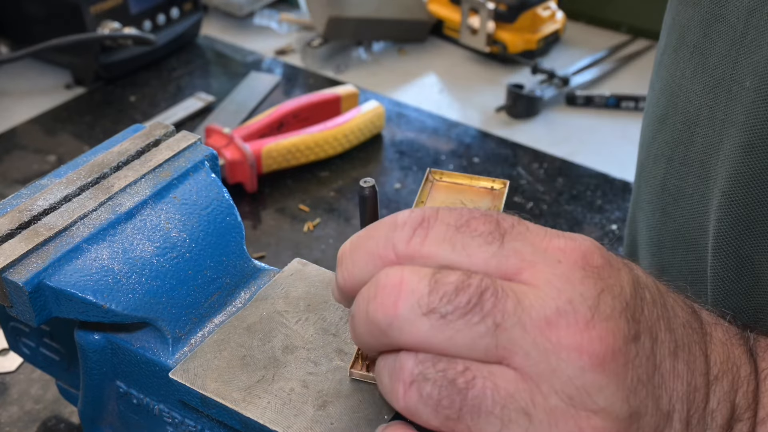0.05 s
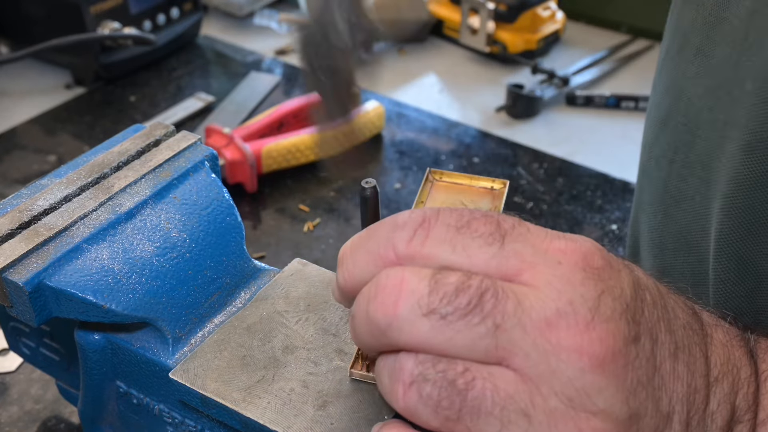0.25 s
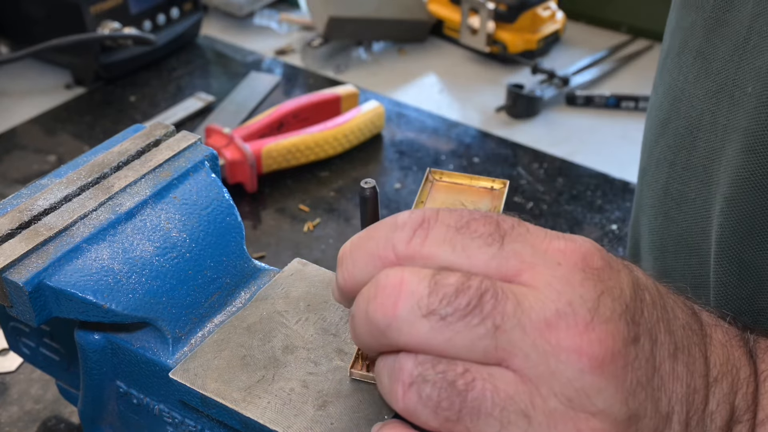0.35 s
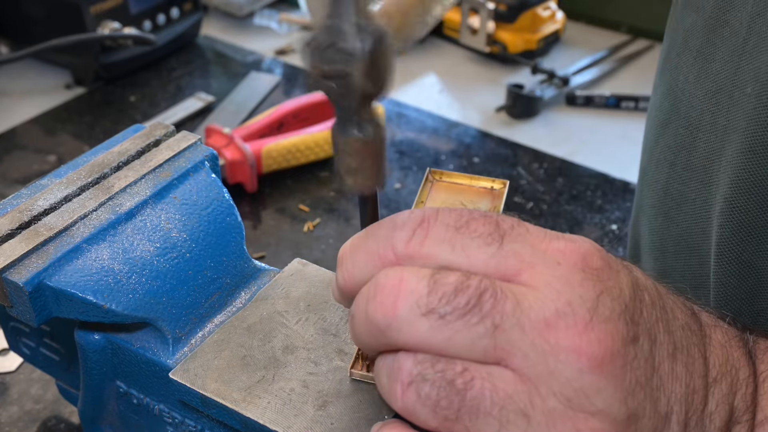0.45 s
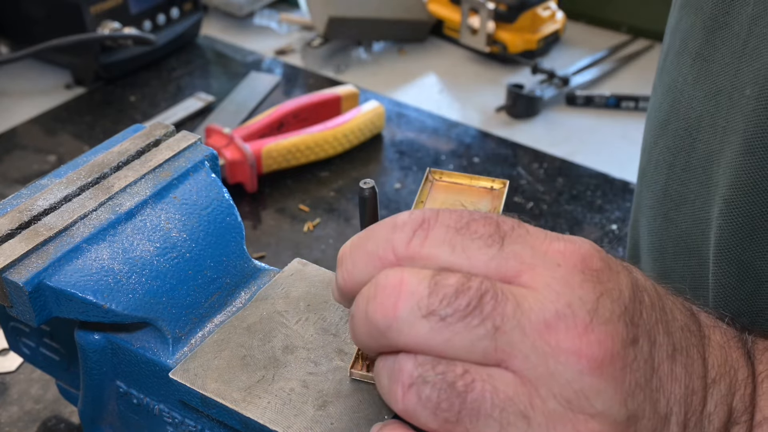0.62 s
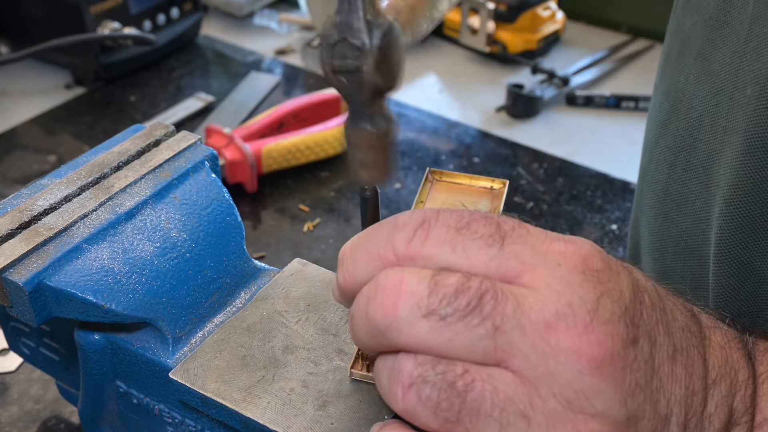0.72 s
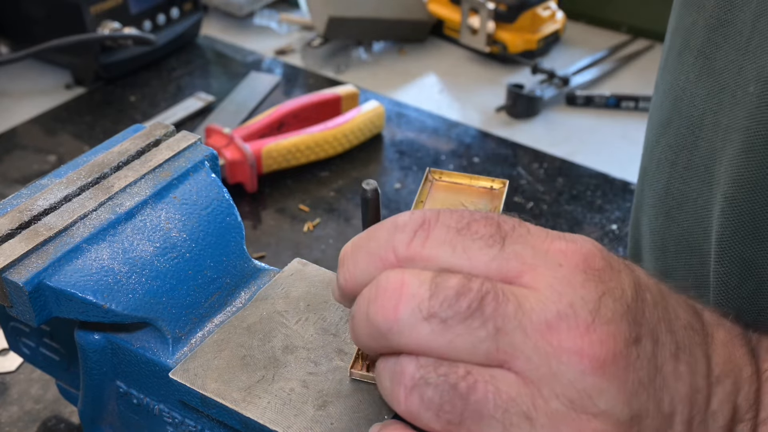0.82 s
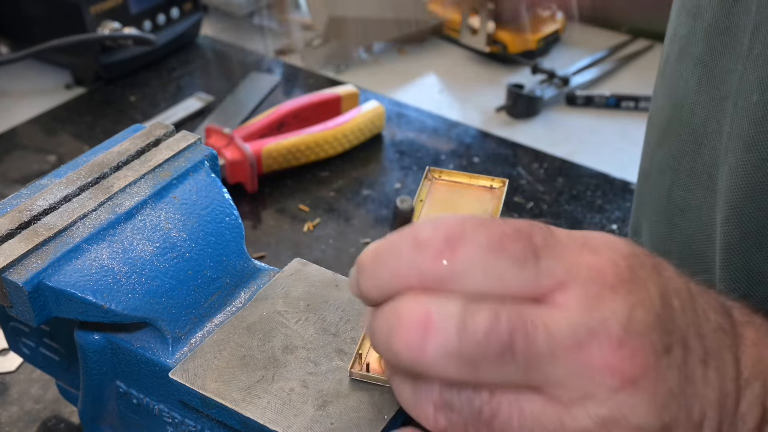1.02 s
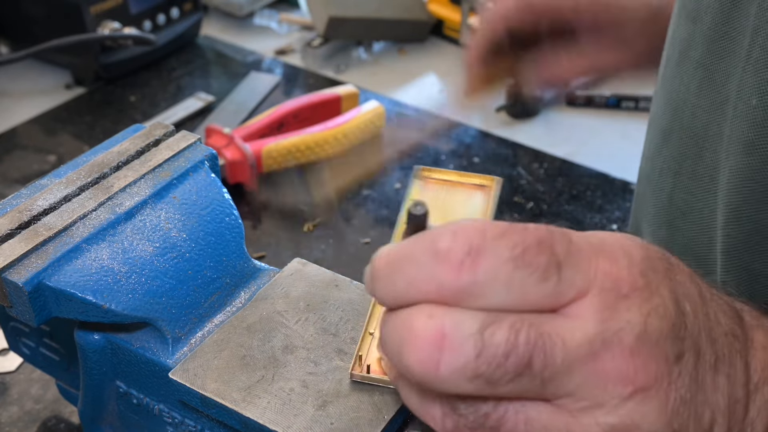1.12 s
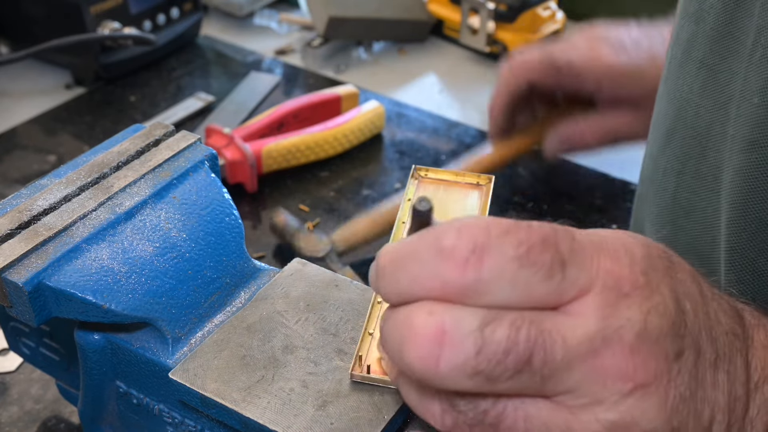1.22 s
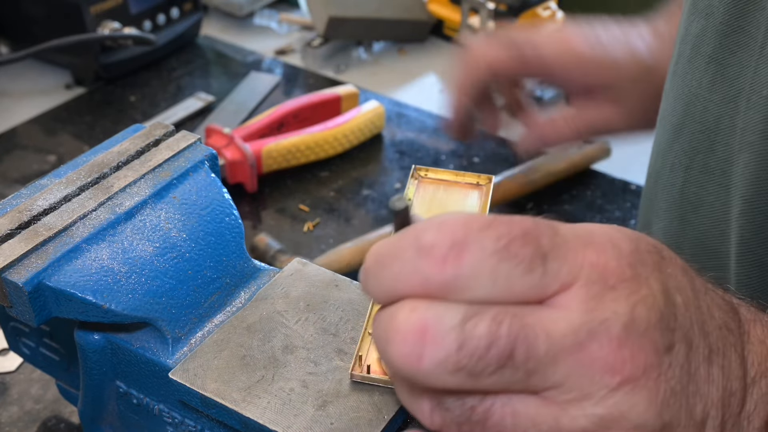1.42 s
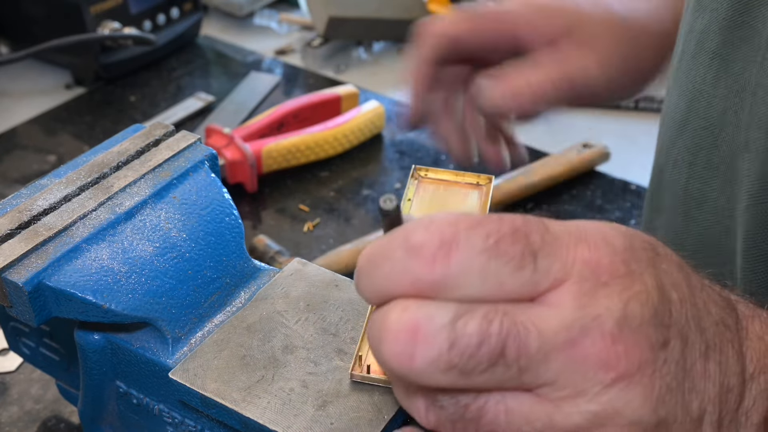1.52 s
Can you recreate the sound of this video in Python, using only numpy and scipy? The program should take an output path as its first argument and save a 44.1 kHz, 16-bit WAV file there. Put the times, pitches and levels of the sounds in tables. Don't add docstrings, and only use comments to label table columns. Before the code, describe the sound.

Loud, sharp steel-on-steel taps about four per second, each with a wooden thump and short room echo, then a tiny double tick and a wooden-handled hammer laid down, rattling to rest, heard close in a small workshop.

```python
import sys
import numpy as np
from scipy import signal
from scipy.fft import rfft, irfft, next_fast_len
from scipy.io import wavfile

SR = 44100
rng = np.random.default_rng(int(sys.argv[2]) if len(sys.argv) > 2 else 0)


def attenuation_scalar(level_db):
    decades = np.asarray(level_db, float) / 20
    return 10 ** decades


def inscribe(sig):
    pcm = np.round(np.clip(np.atleast_2d(sig).T, -1, 1) * 32767)
    wavfile.write(sys.argv[1], SR, pcm.astype(np.int16))


N = 68355
LEAD = SR // 10
T = np.arange(SR // 2) / SR

# pitch_hz, level_db (per Hz)
CRACK_COLOUR = [(290, -15), (500, 5.5), (4090, -3), (8210, -8), (9220, -9), (10100, -11.5), (14000, -7),
                (16000, -21.5)]
# pitch_hz, level_db (per Hz)
WASH_COLOUR = [(1500, -11.5), (3000, -3), (4300, -3.5), (7000, -3), (9500, -2), (12000, -7.5),
               (14500, -5.5), (16000, -12.5)]


def unit(x):
    return x / np.sqrt(np.mean(x ** 2) + 1e-20)


def along(points, hz):
    f, v = np.transpose(points)
    return np.interp(np.log(hz + 1), np.log(f + 1), v)


def coloured(x, gain):
    size = next_fast_len(len(x) + 8192)
    hz = np.fft.rfftfreq(size, 1 / SR)
    return irfft(rfft(x, size) * gain(hz), size)[:len(x)]


def hiss(spectrum, size):
    return unit(coloured(rng.standard_normal(size), lambda hz: attenuation_scalar(along(spectrum, hz))))


def fade(t60, rise, lag=0):
    t = np.maximum(T - lag, 0)
    return attenuation_scalar(-60 * t / t60) * (1 - np.exp(-t / rise))


def ring(modes, scatter_db, rise, lag=0):
    out = np.zeros(len(T))
    for hz, db, t60 in modes:
        strength = attenuation_scalar(db + scatter_db * rng.normal())
        out += strength * fade(t60, rise, lag) * np.sin(2 * np.pi * hz * (T - lag))
    return out


def dying(noise, rise):
    # pitch_hz, t60_s
    room = [(100, .3), (400, 0.23), (1200, 0.33), (3000, 0.3), (5500, 0.31), (9000, 0.28), (12000, 0.26),
            (15000, 0.22)]
    hz, t, z = signal.stft(noise, SR, nperseg=128)
    loss = attenuation_scalar(-60 * t / along(room, hz)[:, None])
    out = signal.istft(z * loss, SR, nperseg=128)[1][:len(T)]
    return out * (1 - np.exp(-T / rise))


def add(track, s, sound):
    part = track[LEAD + round(s * SR):][:len(sound)]
    part += sound[:len(part)]


def quiet_air():
    # pitch_hz, level_db (per Hz)
    air = [(25, -4.5), (100, -3.5), (344, -1), (450, -12), (800, -12), (2200, -22.5), (6000, -27),
           (16000, -43.5)]
    return attenuation_scalar(-67.5) * hiss(air, N)


def tray_ticks(track):
    # start_s, level_db (peak)
    ticks = [
        (.969, -39.5),
        (.974, -36),
    ]
    # pitch_hz, level_db, t60_s
    tray = [(2760, 5, 0.0082), (3600, 5, 0.0096), (6300, -9.5, 0.029), (12100, -14, 0.011)]
    for s, level_db in ticks:
        tinkle = attenuation_scalar(-5.5) * ring(tray, 1.67, 0.00025)
        scrape = attenuation_scalar(-7.5) * fade(0.023, 0.00013) * hiss(CRACK_COLOUR, len(T))
        echoes = attenuation_scalar(-22.5) * dying(hiss(CRACK_COLOUR, len(T)), .002)
        add(track, s, attenuation_scalar(level_db) * (tinkle + scrape + echoes))


def clack(top_hz):
    # pitch_hz, level_db, t60_s
    handle = [(1575, 5, .015), (2278, -13, 0.042), (2933, 4.5, 0.018), (3510, 7, 0.015), (3810, -5, .015),
              (4945, -1, 0.03), (5800, -4, 0.011), (6200, -19.5, 0.054)]
    # pitch_hz, level_db (per Hz)
    snap_colour = [(300, -24.5), (700, -13.5), (1500, 2), (2400, -3.5), (3690, 3), (5270, -7), (7170, -12),
                   (16000, -16)]
    # pitch_hz, level_db (per Hz)
    echo_colour = [(59, -61.5), (100, -55), (991, 5), (1200, -2.5), (1830, -0.5), (7610, -17), (8460, -36),
                   (9410, -46), (16000, -59.5)]
    snap = attenuation_scalar(-6.5) * fade(0.021, 0.00026) * hiss(snap_colour, len(T))
    u = T / 0.00011
    click = -2 * attenuation_scalar(-3) * u * (2 - u) * np.exp(-u)
    ringing = attenuation_scalar(-12.5) * ring(handle, 2, 0.00042)
    echoes = attenuation_scalar(-22) * dying(hiss(echo_colour, len(T)), 0.0011)
    bright_echoes = attenuation_scalar(-37.5) * dying(hiss(WASH_COLOUR, len(T)), 0.00072)
    soften = signal.butter(3, min(top_hz, 20000), fs=SR, output='sos')
    return signal.sosfilt(soften, ringing + snap + click + echoes + bright_echoes)


def bench_knock():
    # pitch_hz, level_db, t60_s
    wood = [(233, -5.5, 0.031), (393.7, -1, 0.068), (887, -3, 0.047), (1018, 0.5, 0.072), (1492, 4, 0.045)]
    # pitch_hz, level_db (per Hz)
    dull_colour = [(60, -24), (200, -2.5), (400, 1), (1000, -1), (2500, -13.5), (6000, -38), (16000, -68)]
    notes = attenuation_scalar(-8.5) * ring(wood, 1.48, 0.0036, 0.00108)
    return notes + attenuation_scalar(-18.5) * dying(hiss(dull_colour, len(T)), 0.0024)


def clatter(track):
    # start_s, clack_db (peak), top_hz (treble limit), knock_db
    contacts = [(1.2304, 0, 14000, -25.5), (1.244, 1.5, 12000, -12), (1.254, -35, 2980, -17),
                (1.2969, -8.5, 4500, -25.5), (1.367, -13.5, 6800, -27.5), (1.401, -19.5, 3720, -24.5),
                (1.462, -18.5, 5260, -32.5), (1.476, -14, 6800, -16), (1.485, -14, 5640, -30),
                (1.525, -18.5, 4900, -24), (1.531, -22, 4630, -36)]
    for s, clack_db, top_hz, knock_db in contacts:
        add(track, s, attenuation_scalar(clack_db) * clack(top_hz) + attenuation_scalar(knock_db) * bench_knock())


def singing_metal(track):
    # start_s, pitch_hz, level_db, t60_s
    head_notes = [(-.056, 9085, -7, .16), (-.056, 9050, -25, 0.33), (.212, 9100, -28.5, 0.13),
                  (.213, 7400, -12.5, 0.044), (.737, 9100, -12.5, 0.098), (.737, 9125, -36.5, 0.42),
                  (0.735, 9070, -41, 0.44), (1.231, 9103, -22, 0.22), (1.244, 7360, -33.5, 0.22),
                  (1.244, 3380, -28, .12), (1.242, 6160, -21.5, 0.066), (1.244, 7980, -40, 0.046),
                  (1.367, 9103, -56, 0.25), (1.41, 7360, -64, .5)]
    # start_s, pitch_hz, level_db, t60_s
    tray_notes = [
        (.969, 1262, -45.5, 0.16),
        (.974, 5141, -50.5, 0.064),
        (.974, 10870, -70.5, .3),
    ]
    for s, *mode in head_notes + tray_notes:
        add(track, s, ring([mode], 0, .001))


def crack():
    hold_s, drop_s = .004, 0.0036
    hold = 0.52 + 1 / (1 + np.exp(np.minimum((T - hold_s) / drop_s, 50)))
    return hiss(CRACK_COLOUR, len(T)) * fade(0.036, 0.0006) * hold


def punch_rattle():
    # pitch_hz, width_hz, level_db, t60_s
    punch = [(4220, 260, -0.5, 0.37), (5430, 130, -9, .24), (6170, 110, -3.5, 0.33),
             (7800, 180, -11.5, 0.27), (9200, 140, -6, 0.3), (10850, 280, -15, 0.29)]
    out = np.zeros(len(T))
    for hz, width, db, t60 in punch:
        noise = rng.standard_normal(len(T))
        band = unit(coloured(noise, lambda f: 1 / (1 + ((f - hz) / width) ** 2)))
        out += attenuation_scalar(db) * fade(t60, .002) * band
    return out


def punch_ping():
    # pitch_hz, level_db, t60_s
    ping = [(2454, -4, 0.018), (3507, -9.5, 0.0093), (4050, -7, 0.075), (4490, -2, 0.046)]
    return ring(ping, 0.87, 0.00027)


def bench_thump():
    # pitch_hz, level_db, t60_s
    bench = [(98.6, -13, 0.2), (222.3, -10.5, 0.19), (276.8, 4.5, 0.056), (419, -8, 0.16), (475, 7, 0.073),
             (700, -3.5, 0.14), (816, -1.5, 0.16), (872, -5, 0.28), (994, -11.5, 0.27), (1154, -18, 0.15),
             (1258, 7, 0.068), (1393, -23.5, 0.58), (1445, -27, 0.083), (1488, -4, 0.16)]
    # pitch_hz, level_db, t60_s
    thud = [(101, -17, 0.07), (295, -2, 0.034), (473, -1.5, 0.023), (732, -2.5, 0.038), (1330, -4, .04)]
    long_notes = attenuation_scalar(-6.5) * ring(bench, 1.3, 0.0028, 0.00298)
    return long_notes + attenuation_scalar(-3) * ring(thud, 1, 0.005, .0035)


def taps(track):
    # start_s, crack_db, thump_db, extra_brightness_db
    blows = [
        (-.056, -3, -9.5, -1),
        (.211, -3, -10, -2.5),
        (.469, -3, -8.5, 0.5),
        (.736, -4.5, -8, 4.5),
    ]
    # pitch_hz, level_db (per Hz)
    tail_colour = [(35, -37), (60, -15.5), (408, 12.5), (566, 4.5), (1010, 7.5), (2840, -8), (4120, -25.5),
                   (9350, -28.5), (16000, -7.5)]
    same = hiss(tail_colour, len(T))
    share = 0.6
    for s, crack_db, thump_db, bright_db in blows:
        wash = attenuation_scalar(bright_db - 19) * dying(hiss(WASH_COLOUR, len(T)), .002)
        metal = crack() + attenuation_scalar(-26) * punch_rattle() + wash + attenuation_scalar(-7.5) * punch_ping()
        echoes = np.sqrt(share) * same + np.sqrt(1 - share) * hiss(tail_colour, len(T))
        low = bench_thump() + attenuation_scalar(-5) * dying(echoes, 0.0017)
        add(track, s, attenuation_scalar(crack_db) * metal + attenuation_scalar(thump_db) * low)


def scene():
    track = np.zeros(N + LEAD)
    tray_ticks(track)
    clatter(track)
    singing_metal(track)
    taps(track)
    mid = track[LEAD:] + quiet_air()
    return np.array([mid, mid])


def roll_off(x):
    return signal.sosfilt(signal.butter(12, 16700, fs=SR, output="sos"), x)


def record(dry):
    # pitch_hz, level_db (under the middle)
    side_level = [(500, -95), (900, -60), (1300, -36), (1700, -25), (6000, -26), (9000, -19), (14000, -14)]
    clip_top, clip_hard = .95, 4.3
    low_hz, top_hz, top_fall_db_per_khz = 61.6, 15500, 39
    x = dry.mean(axis=0)
    x = x / (1 + np.abs(x / clip_top) ** clip_hard) ** (1 / clip_hard)
    x = signal.sosfilt(signal.butter(2, low_hz, 'high', fs=SR, output='sos'), x)
    mid = coloured(x, lambda hz: attenuation_scalar(-top_fall_db_per_khz * np.maximum(hz - top_hz, 0) / 1000))
    smear = rng.standard_normal(len(T)) * fade(.02, .0001)
    blurred = signal.fftconvolve(mid, smear / np.linalg.norm(smear))[:N]
    side = coloured(blurred, lambda hz: attenuation_scalar(along(side_level, hz)))
    return roll_off(np.array([mid + side, mid - side]))


dry = scene()
out = record(dry)
inscribe(out)
```